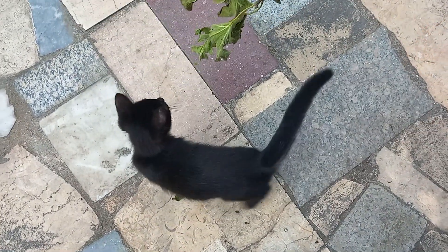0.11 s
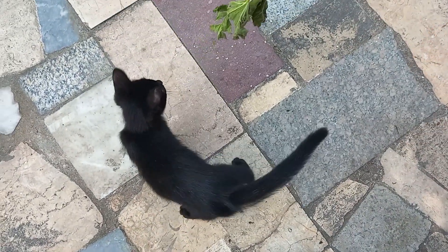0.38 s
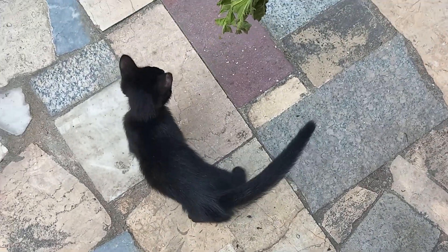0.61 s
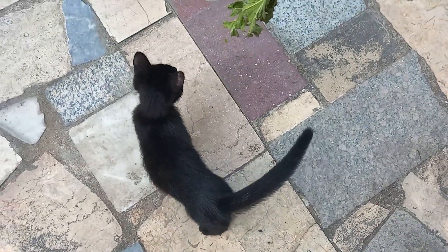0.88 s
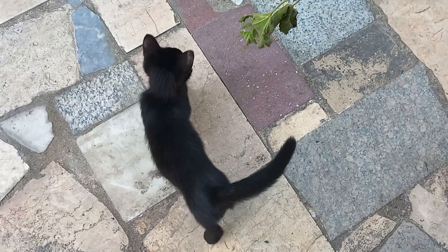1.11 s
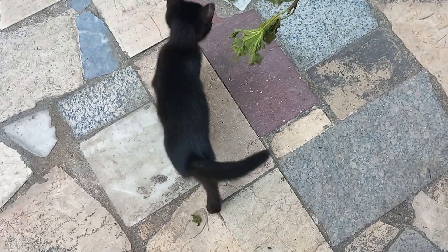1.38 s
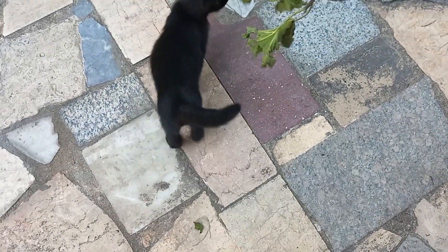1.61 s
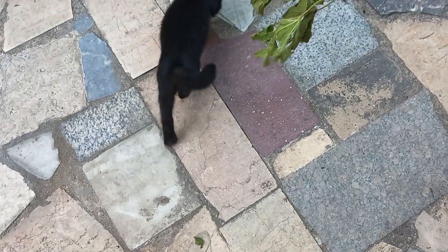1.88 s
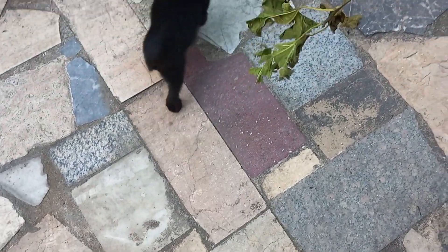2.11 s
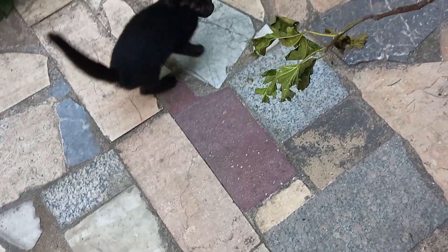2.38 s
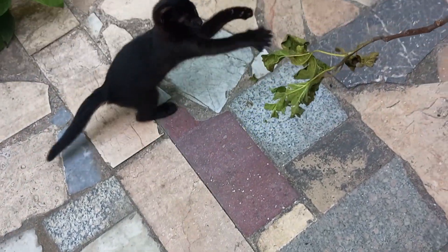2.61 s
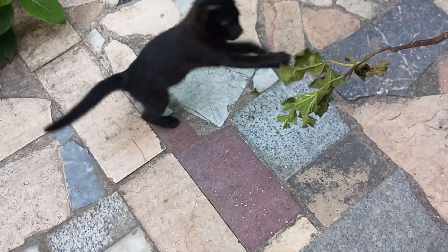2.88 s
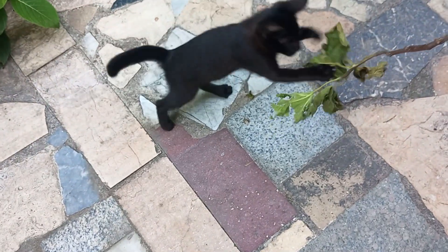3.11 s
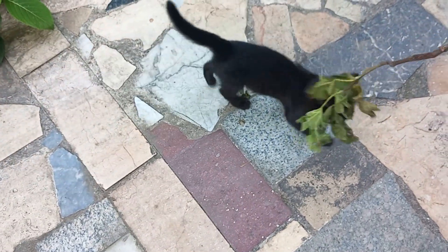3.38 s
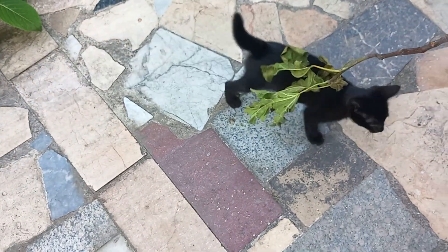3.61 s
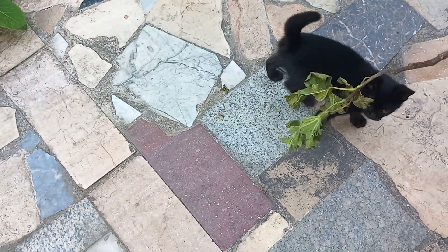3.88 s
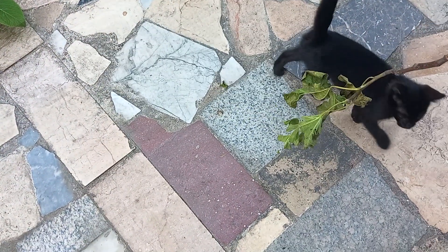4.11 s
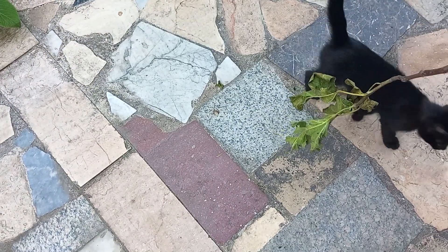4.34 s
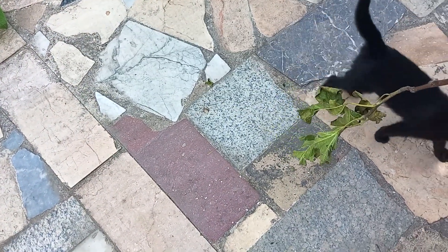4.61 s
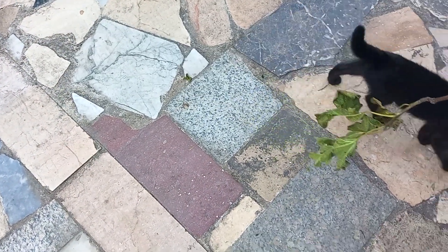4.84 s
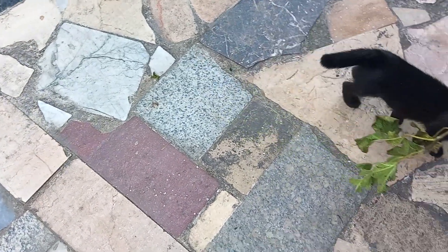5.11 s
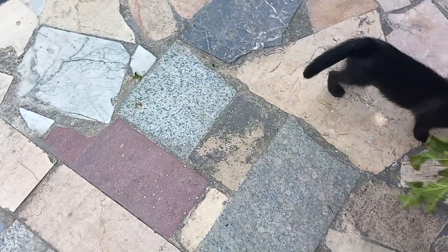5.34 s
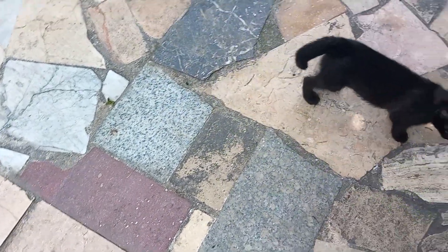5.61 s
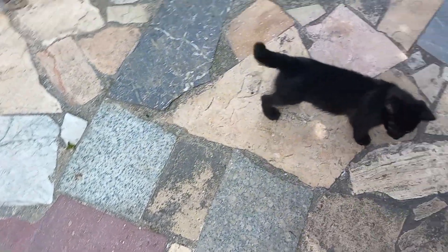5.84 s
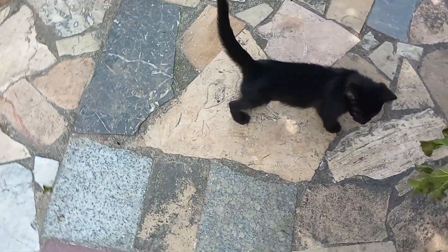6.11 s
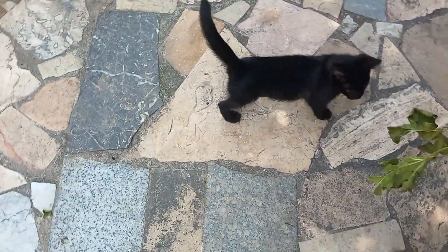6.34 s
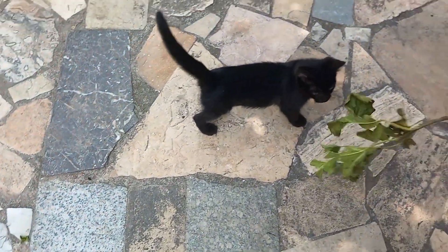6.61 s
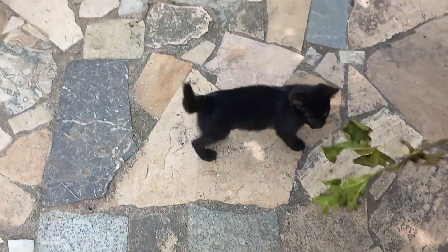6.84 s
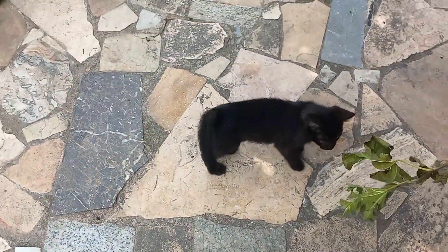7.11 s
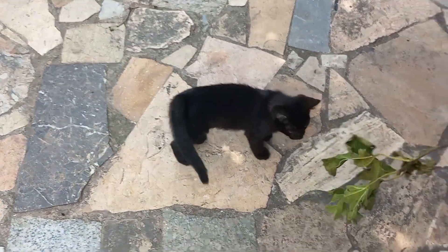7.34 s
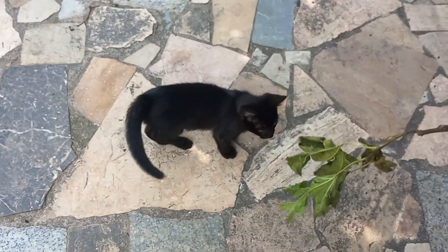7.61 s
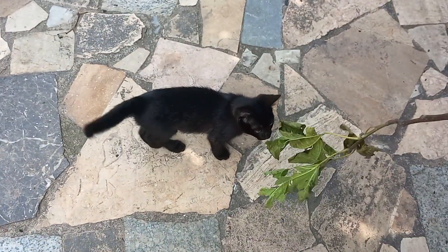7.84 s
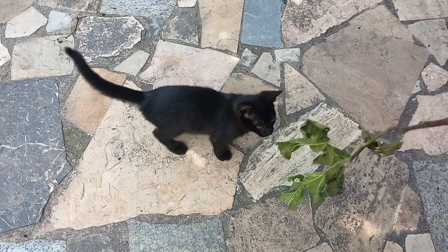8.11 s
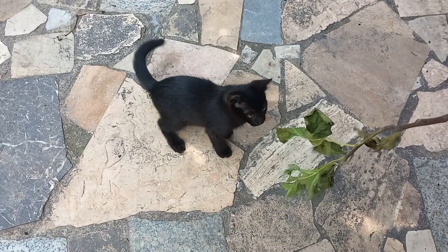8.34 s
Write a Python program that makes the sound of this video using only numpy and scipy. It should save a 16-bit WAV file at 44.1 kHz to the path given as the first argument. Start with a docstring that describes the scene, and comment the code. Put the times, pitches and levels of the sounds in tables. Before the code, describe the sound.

Steady high-pitched insect buzzing fills a stone courtyard, with very quiet leaf ticks, brushing scuffs and tiny squeaks barely surfacing beneath it.

```python
"""Cicadas over a hot stone courtyard

Cicadas in the trees around buzz in a dense chorus, made of random drum clicks and hiss that throb about
eleven times a second; one nearer singer rings clicks in its belly. Far traffic is shaped noise with a few
engine notes. A kitten's paws and a dry leafy twig tick, scuff and squeak on the slabs: grainy noise in
resonances that sink in pitch. A hand-held phone listens through two ports that share the bass only."""
import sys
import numpy as np
from scipy import signal
from scipy.fft import rfft, irfft, next_fast_len
from scipy.io import wavfile
from scipy.ndimage import uniform_filter1d, map_coordinates

SR = 44100
rng = np.random.default_rng(int(sys.argv[2]) if len(sys.argv) > 2 else 0)


def decibels_to_gain(level_db):
    """Convert a level in decibels to a linear amplitude gain (20 dB per decade)."""
    exponent = np.asarray(level_db, float) / 20
    return 10 ** exponent


def output_pcm(signal):
    """Save a mono or channel-first signal as 16-bit PCM at the path in sys.argv[1].

    Samples are clipped to [-1, 1] before scaling.
    """
    pcm = np.clip(np.atleast_2d(signal).T, -1, 1) * 32767
    wavfile.write(sys.argv[1], SR, np.round(pcm).astype(np.int16))


N = 373527  # length in samples

# The chorus swells and drifts across as the phone turns.
# Each row: time in seconds, level in dB, left minus right in dB.
CHORUS_PATH = [(0.0, -31.5, 2), (1.37, -34, 0.5), (1.58, -34, 1.5), (2.41, -31, 1), (3.07, -31, 1.5),
               (3.94, -30, 0.0), (4.88, -30.5, 0.5), (7.15, -31.5, -1.0), (8.47, -32, -0.5)]
# Colour of the song from ribbed drums and hollow bellies. Each row: frequency in Hz, relative strength in dB.
SONG_COLOUR = [(1800, -39), (3000, -38), (3800, -24.5), (4300, -14.5), (4700, -4.5), (5500, -2.5),
               (6100, 1), (6500, 1), (7400, 0), (8600, 0), (9500, -10.5), (10900, -15.5), (12200, -23),
               (13500, -19), (15700, -28.5)]
# Groups of singers. Each row: centre in Hz, clicks a second, size of their own throb in dB,
# share of one slow swell from 0 to 1, share of the overtones' weaker following of the chorus from 0 to 1.
SINGER_GROUPS = [(5000, 3000, 1.5, 1, 0), (6350, 3000, 1.6, 0.73, 0.5), (7000, 2300, -0.5, 0, 0.9),
                 (8740, 3000, 2.04, 0.78, 0), (11400, 3300, -0.3, 0, 1)]
# Bouts in which the whole chorus throbs together.
# Each row: middle throb in seconds, length in seconds, depth in dB, throbs a second.
THROB_BOUTS = [(.687, .4, .4, 9.2), (1.614, .6, 1, 12.8), (2.198, 0.44, 0.9, 12.6), (3.034, 0.94, .9, 10.7),
               (3.866, .4, 0, 13), (4.672, 1, 0.7, 10.4), (5.758, 0.73, 1.2, 11.5),
               (6.852, 0.97, 0.9, 10.8), (7.616, 0.45, 1, 11), (8.207, .9, 1.5, 11.8)]
# One nearer cicada comes forward. Each row: time in seconds, level in dB.
SOLOIST_LEVEL = [(0, -60), (2, -57), (3.5, -61), (4.3, -42.5), (5, -48), (5.8, -52), (6.6, -57), (7.4, -46),
                 (8.47, -56)]
# Colour of the traffic rumble. Each row: frequency in Hz, relative strength in dB.
RUMBLE_COLOUR = [(15, -70), (25, -45), (45, -20.5), (85, -3.5), (101, 0), (146, -3.5), (172, -9), (229, -7),
                 (269, -8), (298, -11.5), (343, -13), (558, -15.5), (855, -22), (1780, -34.5), (3200, -40),
                 (4160, -77), (7040, -120)]
# Likeness of the rumble at the two ports. Each row: frequency in Hz, likeness (1 is the same, 0 unrelated).
PORT_LIKENESS = [(60, 0.75), (150, 0.93), (380, 0.63), (950, -0.2), (2380, -0.07)]
# The deep bass puffs up in short surges of its own.
# Each row: middle in seconds, length in seconds, rise over the deep bass in dB.
BASS_SURGES = [(.13, 0.088, 8), (.49, .25, 4.5), (.92, 0.32, 8), (1.5, 0.29, 6), (2.35, 0.23, 5),
               (3.1, 0.71, 4), (3.85, 0.27, 8), (4.4, 0.44, 7), (4.925, 0.16, 7), (5.85, 0.39, 5),
               (6.25, .25, 0), (6.77, 0.4, 8.5), (7.45, 0.44, 8), (8.2, 0.28, 15.5)]
# Engine notes that stand out for a moment.
# Each row: middle in seconds, length in seconds, pitch in Hz, peak level in dB.
ENGINE_NOTES = [(.85, 0.7, 102, -53.5), (1.452, 0.3, 97, -48), (1.5, 0.52, 148, -47.5),
                (2.023, 0.12, 140, -46), (4.308, 0.32, 128, -51.5), (6.213, 0.096, 132, -46.5),
                (7.71, 0.092, 100, -44), (8.25, .3, 92, -56)]
# Dry ticks of leaf and claw.
# Each row: start in seconds, level in dB before the stroke shapes it, left minus right in dB.
DRY_TICKS = [(2.885, -54.5, -1), (3.024, -48, -4), (3.067, -50, -4), (3.088, -52, -4), (3.235, -59, 4),
             (5.874, -57, -3), (6.868, -63, 4)]
# Leaves swept over stone.
# Each row: start in seconds, length in seconds, level in dB before the stroke, left minus right in dB.
LEAF_SWEEPS = [(3.014, 0.083, -50, 0), (5.492, 0.11, -50.5, -6), (5.752, 0.14, -42, -5),
               (6.559, 0.12, -50, -1), (6.839, 0.094, -57, 4)]
# Thin falling squeaks.
# Each row: start in seconds, length in seconds, level in dB before the stroke, first pitch in Hz.
THIN_SQUEAKS = [(3.028, 0.023, -56, 1940), (5.13, .19, -60.5, 2780), (5.464, .11, -56.5, 2220),
                (5.514, 0.06, -57, 2600)]
# Dull rubs on stone. Each row: start in seconds, length in seconds, level in dB before the stroke,
# first pitch in Hz, place of the peak from 0 to 1.
DULL_RUBS = [(4.43, 0.16, -55.5, 850, .35), (5.786, 0.081, -48, 1900, 0.9), (6.546, 0.072, -49.5, 1520, .4)]
# Narrow-band flicker laid over the steady sounds. Each row: frequency in Hz, depth in dB.
FLICKER_DEPTH = [(600, 0), (1500, 2.5), (3500, 4), (5000, 2), (9000, 1.07), (15000, 3)]
# How the two ports colour the sound. Each row: frequency in Hz, left minus right in dB.
PORT_BALANCE = [(60, 2), (200, 0.5), (450, -3), (740, 5.5), (1220, 9), (2010, 7), (3330, 3.5), (5500, -2),
                (7200, 2), (8500, -2.5), (9500, 0.5), (15000, -0.5)]


def unit(x):
    """Scales a sound to an average strength (rms) of 1."""
    return x / np.sqrt(np.mean(x ** 2) + 1e-20)


def along(points, hz):
    """Reads a (Hz, value) table at any frequency, with the frequencies spaced by ratio."""
    f, v = np.transpose(points)
    return np.interp(np.log(hz + 1), np.log(f + 1), v)


def curves(rows):
    """Turns each column after the time into a curve with one value per sample."""
    s, *cols = np.transpose(rows)
    return [np.interp(np.arange(N) / SR, s, c) for c in cols]


def wobble(rate):
    """A smooth random curve through `rate` random points a second."""
    points = rng.standard_normal(int(N * 30 / SR) + 4)
    return map_coordinates(points, [np.arange(N) * rate / SR])


def swell(s, length):
    """A bell-shaped rise and fall around s seconds; its spread is a third of the length."""
    return np.exp(-0.5 * ((np.arange(N) / SR - s) / (length / 3)) ** 2)


def filtered(x, response):
    """Strengthens or weakens each frequency of x by a response given over Hz."""
    m = next_fast_len(x.shape[-1] + 8192)
    spectrum = rfft(x, m) * response(np.fft.rfftfreq(m, 1 / SR))
    return irfft(spectrum, m)[..., :x.shape[-1]]


def resonance(f, hz, width_hz):
    """Response of two equal resonators in a row, each width_hz wide around hz."""
    return (1j * f * width_hz / (hz * hz - f * f + 1j * f * width_hz)) ** 2


def sides(pan_db):
    """Left and right gains that differ by pan_db."""
    return np.array([decibels_to_gain(pan_db / 2), decibels_to_gain(-pan_db / 2)])


def cicadas():
    """Groups of drum clicks, each in its own part of the song, throb partly with the crowd, partly alone."""
    throb_hz = 11.5
    level_db, pan_db = curves(CHORUS_PATH)
    # one slow swell that some groups have
    slow_db = -3 + 1.1 * swell(4.7, 10.3)
    # the overtones follow only this share of the chorus' swell
    shrill_follows = 0.48
    shrill_db = (shrill_follows - 1) * (level_db - level_db.mean())
    t = np.arange(N) / SR
    crowd_db = np.zeros(N)
    for s, length, depth_db, rate in THROB_BOUTS:
        crowd_db += depth_db * swell(s, length) * np.cos(2 * np.pi * rate * (t - s))

    def throb_alone():
        phase = throb_hz * t + 0.49 * wobble(1.545)
        return wobble(2.99) * np.cos(2 * np.pi * phase) + 0.5 * wobble(0.68)

    centres = np.log([hz for hz, *_ in SINGER_GROUPS])
    song = np.zeros((2, N))
    for k, (hz, rate, own_db, slow, shrill) in enumerate(SINGER_GROUPS):
        # every port faces other trees, so clicks and private beats differ
        near = (rng.random((2, N)) < rate / SR) * rng.standard_normal((2, N)) * np.sqrt(SR / rate)
        far = rng.standard_normal((2, N))  # distant singers blur into a hiss
        alone = np.array([throb_alone() for port in range(2)])
        group_db = crowd_db + own_db * alone + slow * slow_db + shrill * shrill_db
        voices = (0.5 * near + far) * decibels_to_gain(group_db)

        def group_colour(f):
            # neighbouring groups fade into each other
            share = np.interp(np.log(f + 1), centres, np.arange(len(SINGER_GROUPS)) == k)
            return np.sqrt(share) * decibels_to_gain(along(SONG_COLOUR, f))

        song += filtered(voices, group_colour)
    return unit(song) * decibels_to_gain(level_db) * sides(pan_db)


def soloist():
    """Uneven drum clicks ring in one hollow belly; the same clicks reach both ports, the left a little late."""
    belly_hz, belly_width_hz, clicks_a_second = 6150, 300, 1500
    clicks = (rng.random(N) < clicks_a_second / SR) * rng.standard_normal(N)
    buzz = unit(filtered(clicks, lambda f: resonance(f, belly_hz, belly_width_hz)))
    level_db = curves(SOLOIST_LEVEL)[0] + 1.4 * wobble(10.0)
    return decibels_to_gain(level_db) * np.array([np.roll(buzz, shift=16), buzz])


def traffic():
    """Patchy noise makes a rumble, alike at both ports in the bass, with a few unsteady engine notes."""
    level_db = -53.5 + 0.6 * wobble(3.5)
    deep_db = -60.5 + 2 * wobble(6.5)
    for s, length, db in BASS_SURGES:
        deep_db += db * swell(s, length)

    # random patches of time and pitch grow stronger or weaker
    z = signal.stft(rng.standard_normal((2, N)), nperseg=2048)[2]
    patches = uniform_filter1d(rng.standard_normal(z.shape[1:]), 3, axis=0)
    patches = uniform_filter1d(patches, 5, axis=1)
    pair = signal.istft(z * decibels_to_gain(1.63 * unit(patches)), nperseg=2048)[1][:, :N]

    def mid_and_side(hz):
        # more mid than side makes the two ports more alike
        turn = np.arccos(np.clip(along(PORT_LIKENESS, hz), -1, 1)) / 2
        return decibels_to_gain(along(RUMBLE_COLOUR, hz)) * np.array([np.cos(turn), np.sin(turn)])

    mid, side = filtered(pair, mid_and_side)
    rumble = np.array([mid + side, mid - side])
    # the deep bass gets a level of its own
    deep = filtered(rumble, lambda hz: 1 / (1 + (hz / 130) ** 6))

    t = np.arange(N) / SR
    notes = np.zeros(N)
    for s, length, hz, db in ENGINE_NOTES:
        notes += decibels_to_gain(db) * swell(s, length) * np.sin(2 * np.pi * hz * t + 1.13 * wobble(6.6))
    return decibels_to_gain(level_db) * unit(rumble - deep) + decibels_to_gain(deep_db) * unit(deep) + notes


def scuff(s, length, db, hz, peak, pan_db, width_hz, sag, hiss_db):
    """Grainy friction in a resonance that sinks by a rate of sag a second, with a broad hiss of dry leaf."""
    size = SR // 4
    draws = rng.standard_normal((4, size))
    u = np.clip(np.arange(size) / (SR * length), 0, 1)  # progress of the stroke
    grit = decibels_to_gain(2.8 * unit(uniform_filter1d(draws[0], size=150)))  # the contact catches and slips
    rub = grit * (0.73 * draws[1] + 0.72 * draws[2:])  # partly alike at both ports

    # fade through seven resonances, each lower than the one before
    stages = np.linspace(0, 1, 7)
    body = np.zeros((2, size))
    for stage in stages:
        stage_hz = hz * np.exp(-stage * sag * length)
        ring = unit(filtered(rub, lambda f: resonance(f, stage_hz, width_hz)))
        body += ring * np.sqrt(np.interp(u, stages, stages == stage))

    hiss = unit(filtered(rub, lambda f: f ** 2 / (f ** 2 + 800 ** 2) / np.sqrt(1 + (f / 14000) ** 2)))
    stroke = np.interp(u, [0, np.clip(peak, 0.05, 0.95), 1], [0, 1, 0]) ** 1.2
    sound = decibels_to_gain(db) * stroke * unit(body + decibels_to_gain(hiss_db) * hiss) * sides(pan_db)[:, None]
    out = np.zeros((2, N))
    start = round(s * SR)
    out[:, start:start + size] = sound
    return out


def ticks():
    """Leaf and claw tap the stone: very short strokes in a wide resonance."""
    return sum(scuff(s, 0.017, db, 2400, 0.31, pan_db, width_hz=5100, sag=12, hiss_db=-8)
               for s, db, pan_db in DRY_TICKS)


def sweeps():
    """Leaves brush over stone: the friction is nearly all hiss."""
    return sum(scuff(s, length, db, 2600, 0.45, pan_db, width_hz=8000, sag=1.1, hiss_db=22)
               for s, length, db, pan_db in LEAF_SWEEPS)


def squeaks():
    """Thin squeaks: friction in a narrow resonance that falls in pitch."""
    return sum(scuff(s, length, db, hz, 0.48, pan_db=-5, width_hz=190, sag=1.8, hiss_db=-24)
               for s, length, db, hz in THIN_SQUEAKS)


def rubs():
    """Dull rubs on stone: friction in a fairly low resonance with little hiss."""
    return sum(scuff(s, length, db, hz, peak, pan_db=-6, width_hz=650, sag=0.69, hiss_db=-17)
               for s, length, db, hz, peak in DULL_RUBS)


def narrow_band_flicker(x):
    """Bands some sixty Hz wide rise and sink for less than a tenth of a second, partly alike at both ports."""
    hz, _, z = signal.stft(x, SR, nperseg=2048)
    draws = rng.standard_normal((3,) + z.shape[1:])
    flicker = 0.64 * draws[0] + 0.77 * draws[1:]  # a shared part and one for each port
    flicker = uniform_filter1d(flicker, size=3, axis=1)
    flicker = uniform_filter1d(flicker, size=3, axis=2)
    gain_db = along(FLICKER_DEPTH, hz)[:, None] * unit(flicker)
    return signal.istft(z * decibels_to_gain(gain_db), SR, nperseg=2048)[1][:, :N]


def scene():
    """A narrow-band flicker is laid over the steady sounds; the contacts on the slabs are added plain."""
    steady = cicadas() + soloist() + traffic()
    return narrow_band_flicker(steady) + ticks() + sweeps() + squeaks() + rubs()


def roll_off(x):
    """The treble ends steeply here."""
    return signal.sosfilt(signal.butter(12, 15790, fs=SR, output="sos"), x)


def record(dry):
    """The phone's two ports colour the sound differently."""
    mix = filtered(dry, lambda hz: sides(along(PORT_BALANCE, hz)))
    return roll_off(mix)


dry = scene()
out = record(dry)
output_pcm(out)
```